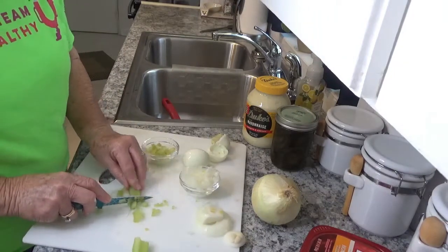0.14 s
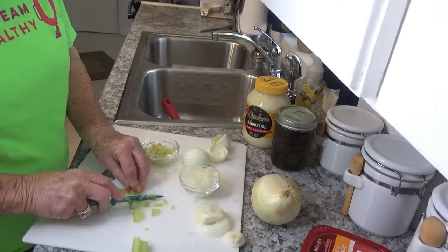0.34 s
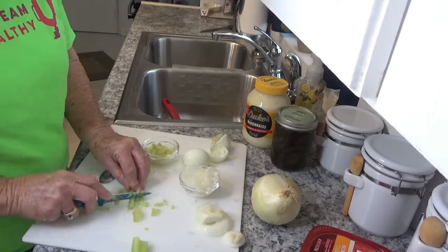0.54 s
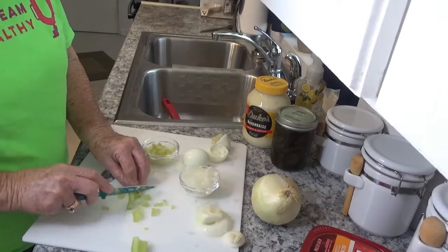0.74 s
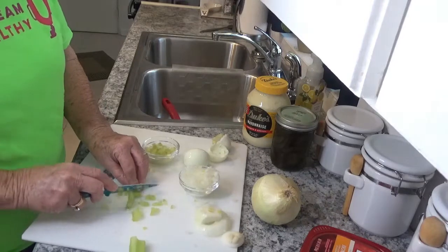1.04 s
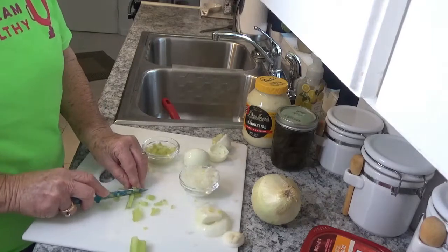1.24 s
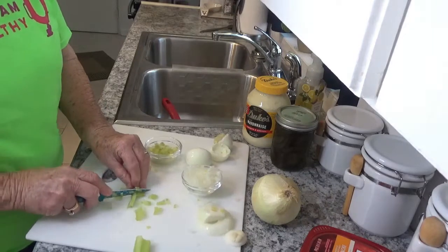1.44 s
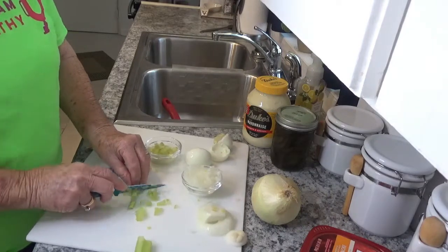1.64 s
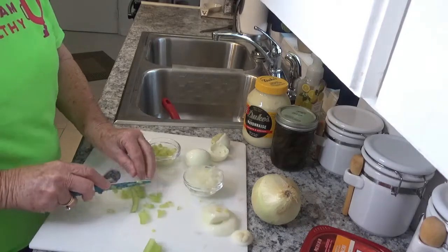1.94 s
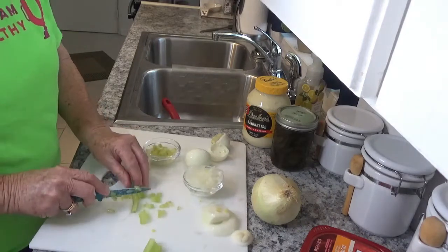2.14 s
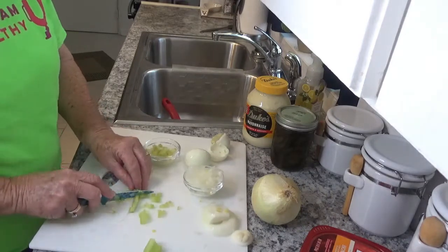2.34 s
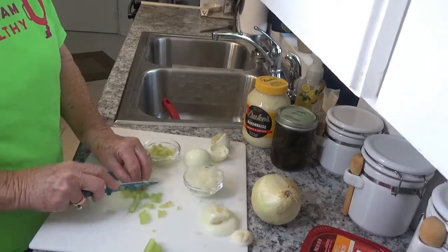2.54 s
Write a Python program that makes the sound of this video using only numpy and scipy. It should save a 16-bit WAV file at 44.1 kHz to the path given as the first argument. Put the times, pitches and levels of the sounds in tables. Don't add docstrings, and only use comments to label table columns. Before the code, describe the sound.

Close by, crunchy celery cuts end in bright board knocks, uneven in strength, with tiny ticks of loose pieces between, short room echoes and a low steady appliance hum behind.

```python
import sys
import numpy as np
from scipy import signal
from scipy.fft import rfft, irfft
from scipy.io import wavfile
from scipy.ndimage import uniform_filter1d

SR = 44100
rng = np.random.default_rng(int(sys.argv[2]) if len(sys.argv) > 2 else 0)


def field_ratio(decibels):
    return 10 ** (np.asarray(decibels, dtype=float) / 20)


def generate_wav(signal):
    frames = np.transpose(np.atleast_2d(signal))
    scaled = np.clip(frames, -1, 1) * 32767
    pcm = np.round(scaled).astype(np.int16)
    wavfile.write(sys.argv[1], SR, pcm)


N = 119070


def evened(x):
    return x / np.sqrt(np.mean(x ** 2) + 1e-20)


def read(points, hz):
    f, value = np.transpose(points)
    return np.interp(np.log(hz + 1), np.log(f + 1), value)


def add(mix, start_s, sound):
    part = mix[round(start_s * SR):][:len(sound)]
    part += sound[:len(part)]


def resonate(x, hz, width_hz):
    r = np.exp(-np.pi * width_hz / SR)
    return 2 * signal.lfilter([1 - r], [1, -r * np.exp(2j * np.pi * hz / SR)], x).real


def colour(x, points):
    log_gain = np.log(field_ratio(read(points, abs(np.fft.fftfreq(2048, 1 / SR)))))
    spectrum = np.exp(log_gain - 1j * signal.hilbert(log_gain).imag)
    taps = np.fft.ifft(spectrum).real[:1024]
    return signal.oaconvolve(x, taps)[:len(x)]


def air(points, level_db, patchy_db):
    # frequency in Hz, left-right likeness 0-1.
    likeness = [(60, 0.99), (170, 0.96), (470, 0.99), (1340, 0.5), (3760, 0.35), (10600, 0.81)]
    frames, hz = N // 512 + 5, np.fft.rfftfreq(2048, 1 / SR)
    a, b, c, d, patches = rng.standard_normal((frames, 1025, 5)).T
    patches = uniform_filter1d(patches, size=10, axis=0)
    patches = evened(uniform_filter1d(patches, size=6, axis=1))
    shared = np.clip(read(likeness, hz), -1, 1)[:, None]
    left = a + 1j * b
    right = shared * left + np.sqrt(1 - shared ** 2) * (c + 1j * d)
    inside = (hz >= points[0][0]) & (hz <= points[-1][0])
    gain = field_ratio(read(points, hz)[:, None] + patchy_db * patches) * inside[:, None]
    noise = signal.istft(np.array([left, right]) * gain, nperseg=2048, noverlap=1536)[1]
    return field_ratio(level_db) * evened(noise[:, :N])


def appliances():
    # frequency in Hz, level in dB per Hz.
    fan = [(82, -52), (140, -19.5), (225, -1.5), (324, 2), (355, -1.5), (459, 3), (604, -8), (1620, -18.5),
           (11000, -32), (14300, -79), (22000, -120)]
    rumble = [(15, -15), (25, -7), (40, 24), (55, -46), (75, -14), (100, 10.5), (125, 0), (160, -19)]
    # frequency in Hz, width in Hz, level in dB rms.
    motor = [(58.9, 2.3, -60), (96.4, 11.2, -57.5), (128.5, 2.1, -66), (267, 11, -61.5), (329.4, 31, -66),
             (449, 71, -59.5)]
    tones = np.zeros(N)
    for hz, width_hz, db in motor:
        tone = resonate(rng.standard_normal(N), hz, width_hz)
        tones += field_ratio(db) * evened(resonate(tone, hz, width_hz))
    return air(fan, -46, patchy_db=2.5) + air(rumble, -58, patchy_db=0.5) + tones


def earlier_stroke():
    # frequency in Hz, level in dB per Hz.
    spectrum = [(590, -35), (1000, -19), (2730, -2.5), (3170, -17), (7450, -4), (11000, -9), (14300, -38),
                (22000, -120)]
    t60_s = 1
    return air(spectrum, -50.5, patchy_db=4.5) * field_ratio(-60 * np.arange(N) / SR / t60_s)


def knock(peak_db, low_db, pitch, snap_db):
    # frequency in Hz, level in dB, t60 in seconds.
    board_modes = [(545, -1.5, 0.0094), (716, 1, 0.023), (910, -5, 0.0085), (1018, -2, .015),
                   (1447, -4, 0.0058), (1756, 7, 0.0075), (2145, 7.5, 0.0059), (2575, 11.5, 0.0073),
                   (2892, 8.5, 0.0082), (3340, 6, 0.0055), (4160, 9, 0.002)]
    body_db, bloom_s = -1, 0.0013
    low_hz, detune, scatter_rad = 1200, 0.0032, 0.12
    edge_hz, edge_s, edge_db = 4600, 0.00013, 2.5
    crack_db, crack_t60_s = -10.5, 0.021
    thud_hz, thud_db, thud_t60_s, thud_delay_s = 245, -25, 0.072, 0.05

    t = np.arange(5000) / SR
    hz, mode_db, t60_s = np.transpose(board_modes)[:, :, None]
    low = hz < low_hz
    tune = np.where(low, 1, pitch) + detune * rng.uniform(-1.2, 1, hz.shape)
    phase = np.pi * np.arange(len(hz))[:, None] + scatter_rad * rng.standard_normal(hz.shape)
    modes = field_ratio(mode_db + low_db * low - 60 * t / t60_s) * np.sin(2 * np.pi * hz * tune * t + phase)
    crack = field_ratio(crack_db + snap_db - 60 * t / crack_t60_s) * np.diff(rng.standard_normal(len(t) + 1))
    bloom = (1 - np.exp(-t / bloom_s)) ** 2
    body = field_ratio(body_db) * bloom * (modes.sum(0) / 2 + crack)

    u = t - 2 * edge_s
    tick = -np.sin(2 * np.pi * edge_hz * u) * np.exp(-(u / edge_s) ** 2)
    thud = field_ratio(thud_db - 60 * t / thud_t60_s) * np.sin(2 * np.pi * thud_hz * t)
    thud *= 1 - np.exp(-t / thud_delay_s)
    return field_ratio(peak_db) * (body + field_ratio(edge_db + snap_db) * tick + thud)


def tear(peak_db, hz, length_s, wide_db):
    # frequency in Hz, gain in dB.
    stalk_colour = [(180, -6), (300, -2.5), (1800, -4.5), (3800, -1.5), (5750, -1), (9300, 1), (11000, -6),
                    (16000, -23.5)]
    snaps_per_s, snap_spread_db = 10000, 3.0
    ring_q, rise_share = 7.2, 0.25
    t = np.arange(2200) / SR
    chance, sign, size = rng.random((3, len(t)))
    size = field_ratio(-snap_spread_db * np.log(size + 0.025))
    clicks = (chance < snaps_per_s / SR) * np.sign(sign - 0.5) * size
    shape = np.minimum(t / (rise_share * length_s), 1) * np.exp(-(t / length_s) ** 3)
    burst = evened(clicks) * shape
    ring = resonate(burst, hz, hz / ring_q) * np.sqrt(SR * ring_q / hz) / 4
    crisp = colour(ring + field_ratio(wide_db) * burst, stalk_colour)
    return field_ratio(peak_db) * crisp / abs(crisp).max()


def push(peak_db, hz):
    push_s = 0.0055
    t = np.arange(4000) / SR
    u = t / push_s
    return field_ratio(peak_db) * np.e * u * np.exp(-u) * np.sin(2 * np.pi * hz * t)


def celery():
    # start in seconds, peak in dB, colour in Hz, length in seconds.
    ticks = [(0.145, -38, 8500, 0.0064), (0.159, -25, 9500, 0.0027), (0.19, -22.5, 7550, 0.0054),
             (0.2358, -21, 9300, 0.0014), (0.343, -20.5, 8550, 0.0035), (0.368, -20.5, 8600, 0.0012),
             (0.558, -28, 7500, 0.012), (0.873, -35, 7000, 0.012), (0.885, -20, 3630, 0.0053),
             (1.208, -30.5, 3900, 0.013), (1.232, -29.5, 3700, 0.026), (2.33, -30, 5060, 0.083),
             (0.419, -25.5, 8950, 0.0037), (1.063, -31.5, 7360, 0.0039), (1.44, -41, 9200, 0.041),
             (1.4655, -27, 9400, 0.0068), (1.652, -35.5, 4500, 0.0021), (1.667, -35, 8100, 0.0054),
             (2.199, -31.5, 3200, 0.0062), (2.205, -24.5, 7260, 0.00068), (2.263, -21, 8500, 0.00043),
             (2.264, -33.5, 4230, 0.0033), (2.666, -23.5, 8000, 0.0066), (2.695, -46, 7800, 0.0013)]
    # start in seconds, peak in dB, colour in Hz, length in seconds.
    crunches = [(.2424, -10, 4170, 0.0043), (.548, -18, 8900, 0.0042), (.5525, -12.5, 7460, .004),
                (.553, -22.5, 5860, .005), (.573, -16, 5810, 0.0064), (.5745, -22, 9000, 0.0065),
                (.5872, -10, 9900, 0.0024), (.59, -8, 7400, 0.0029), (.593, -18, 9300, 0.0047),
                (.5972, -15, 7300, 0.0026), (.6082, -4.5, 9800, 0.0022), (.6085, -32, 4500, .002),
                (.6105, -19, 8800, 0.0019), (.8675, -24, 7500, 0.0062), (.8875, -16.5, 7500, 0.0053),
                (.895, -17.5, 5810, 0.0029), (.909, -18.5, 8200, 0.0039), (.9095, -16, 4140, 0.0098),
                (.913, -21, 8800, 0.0028), (.9165, -8.5, 5900, 0.0024), (1.2015, -26.5, 9000, 0.0065),
                (1.206, -23, 7500, .003), (1.2248, -15, 7400, 0.0049), (1.226, -21, 5900, 0.0081),
                (1.258, -9.5, 8600, 0.0081), (1.261, -11, 5950, 0.0066), (1.275, -21, 7700, 0.017),
                (1.29, -17, 8140, 0.0086), (1.4802, -11, 5630, 0.0036), (1.4855, -8, 8000, 0.0025),
                (1.4872, -10, 9500, 0.007), (2.29, -16, 4170, 0.003), (2.2922, -11, 8270, 0.0048),
                (2.2965, -16, 7650, 0.0049), (2.3185, -11.5, 6640, 0.0026), (2.3205, -9, 9300, 0.0073),
                (2.353, -20, 8050, .002), (2.367, -18, 8700, 0.0033), (2.3715, -26, 5300, 0.0024),
                (2.375, -8.5, 9200, 0.0023), (2.379, -8, 8160, 0.0022), (2.382, -10.5, 5260, 0.0019),
                (2.3845, -10.5, 10500, 0.0034)]
    # start in seconds, peak in dB, pitch in Hz.
    pushes = [
        (.25, -34.5, 176),
        (.548, -45, 195),
        (.588, -35, 185),
        (.868, -38.5, 150),
        (.888, -40, 168),
        (0.916, -39.5, 227),
        (1.204, -41, 190),
        (1.288, -41, 111),
        (2.289, -37.5, 195),
        (2.321, -36, 120),
    ]
    out = np.zeros(N)
    for rows, level_db, wide_db in ((crunches, -0.3, -2), (ticks, -1.5, -9)):
        for start_s, *row in rows:
            add(out, start_s, field_ratio(level_db) * tear(*row, wide_db))
    for start_s, *row in pushes:
        add(out, start_s, push(*row))
    return out


def kitchen(x):
    # frequency in Hz, t60 in seconds.
    decay = [(150, 0.74), (660, 0.32), (1740, 0.33), (4600, 0.33), (10000, 0.29)]
    # frequency in Hz, side share 0-1.
    side_share = [(100, 0.15), (300, 0.09), (700, 0.37), (2500, 0.41), (4000, 0.51), (9000, 0.37)]
    # delay in seconds, left level in dB, right level in dB.
    echoes = [(.0019, -5, -15), (.0033, -6, -5.5), (.0062, -5.5, -2), (.0083, -8, -9), (.0112, -8.5, -9.5),
              (.0150, -14.5, -23.5), (.0210, -17, -20)]
    # frequency in Hz, gain in dB.
    wall_colour = [(60, -60), (200, 3.5), (700, -4.5), (1800, 3.5), (3200, 1.5), (5000, -3), (7500, 2.3),
                   (9500, -0.5), (12000, -7)]
    tail_db, tail_rise_s = 4.5, 0.0073

    count = SR // 40
    taps = np.zeros((2, count * 20))
    at = np.arange(count) * 20 + rng.integers(0, 20, (2, count))
    np.put_along_axis(taps, at, rng.choice([-1., 1.], at.shape), 1)
    hz, t, z = signal.stft(taps, SR, nperseg=256)
    side = read(side_share, hz)[:, None] * z[1:]
    z = z[:1] + side * np.array([1, -1])[:, None, None]
    fade = field_ratio(-60 * t / read(decay, hz)[:, None])
    tail = signal.istft(z * fade, SR, nperseg=256)[1]
    tail = tail * np.minimum(np.arange(tail.shape[1]) / SR / tail_rise_s, 1) ** 2
    tail = field_ratio(tail_db) * tail / np.linalg.norm(tail[0])
    for k, (delay_s, left_db, right_db) in enumerate(echoes):
        i = round(delay_s * SR)
        tail[0, i] += (-1) ** k * field_ratio(left_db)
        tail[1, i + k % 2] += (-1) ** k * field_ratio(right_db)
    return signal.fftconvolve(colour(x, wall_colour)[None], tail, axes=1)[:, :N]


def knife():
    knock_s = [.144, .2461, .55, .6158, .869, .9204, 1.4883, 1.807, 2.2935, 2.3848]
    # peak in dB, low modes in dB, pitch ratio, room in dB, snap of the bare edge in dB.
    knocks = [
        (-32.5, -9, 1.18, -4.5, -10),
        (-7.5, -2, 1.016, 3, 0),
        (-34, 17.5, 1.04, -5, -30),
        (-9, 1.2, 0.98, 1.5, -1.5),
        (-38, 10.5, 0.99, 5, -30),
        (-5, 2, 1.003, -4, -2.8),
        (-9.5, 0, 1.061, 2, -10),
        (-29.5, -6, 1.09, -8.5, -8),
        (-28, 13, 1.03, -3.5, -30),
        (-8, 5, 0.86, -11.5, -5),
    ]
    mix = np.zeros((2, N))
    for start_s, (peak_db, low_db, pitch, room_db, snap_db) in zip(knock_s, knocks):
        board = np.zeros(N)
        add(board, start_s, knock(peak_db, low_db, pitch, snap_db))
        mix += board + kitchen(field_ratio(2.87 + room_db) * board)
    return mix


def scene():
    background = appliances() + earlier_stroke()
    stalk = celery()
    return background + knife() + stalk + kitchen(field_ratio(-9) * stalk)


def top_cut(x):
    return signal.sosfilt(signal.butter(12, 11170, fs=SR, output="sos"), x)


def record(dry):
    ceiling, cut_hz, shelf_top_hz = 0.85, 11050, 15600
    soft = ceiling * np.tanh(dry / ceiling)
    corners_hz = [cut_hz, cut_hz + 250, cut_hz + 900, shelf_top_hz, shelf_top_hz + 100]
    shelf_db = np.interp(np.fft.rfftfreq(N, 1 / SR), corners_hz, [0, -24, -22, -30, -90])
    limited = irfft(rfft(soft, axis=1) * field_ratio(shelf_db), N, axis=1)
    return top_cut(limited)


dry = scene()
out = record(dry)
generate_wav(out)
```